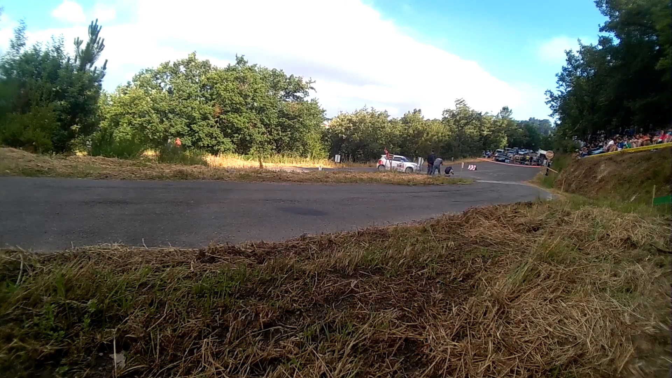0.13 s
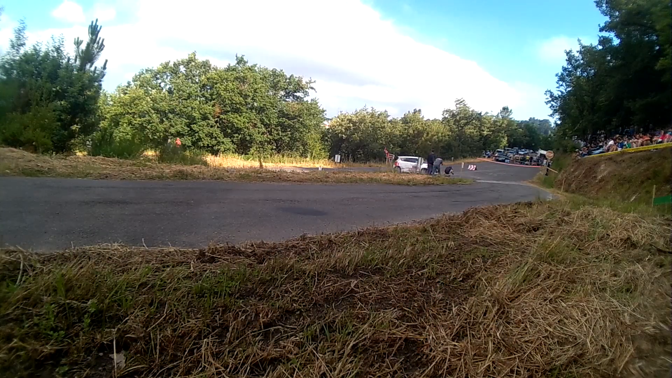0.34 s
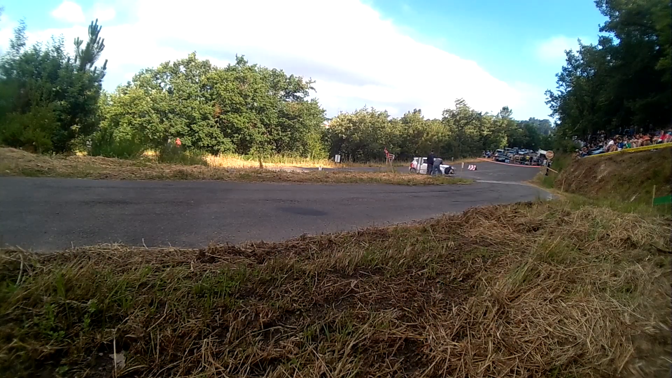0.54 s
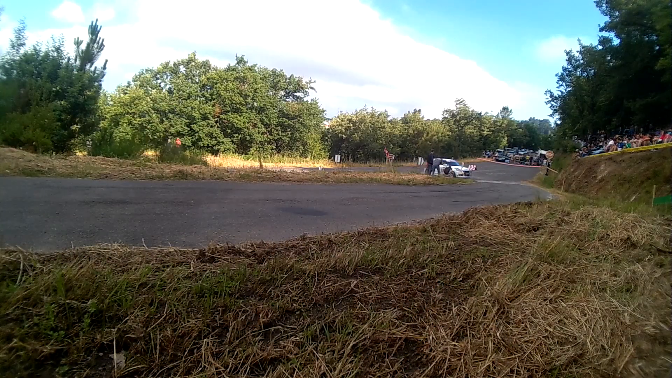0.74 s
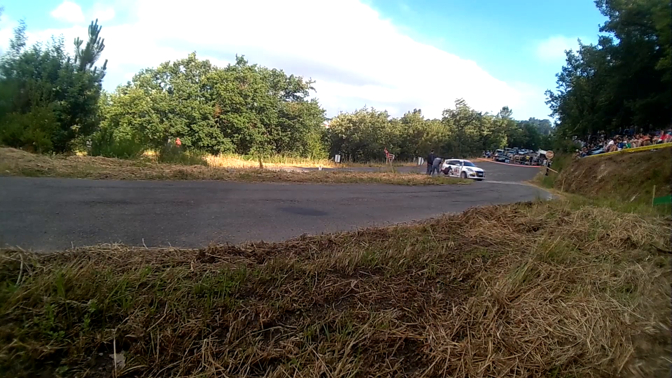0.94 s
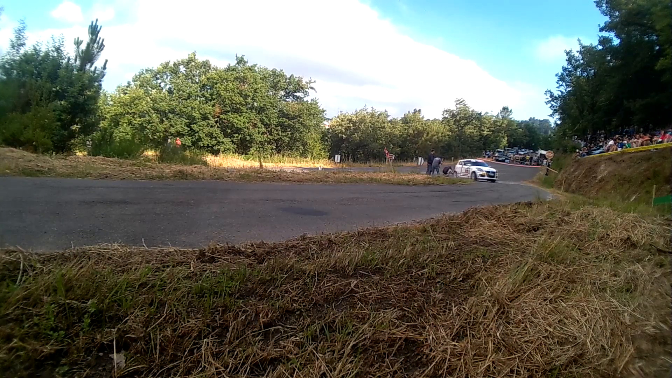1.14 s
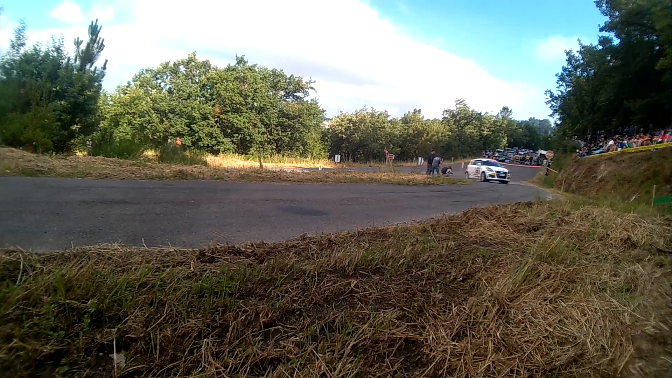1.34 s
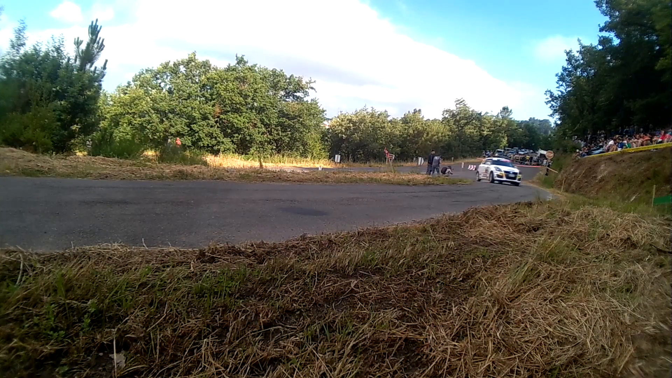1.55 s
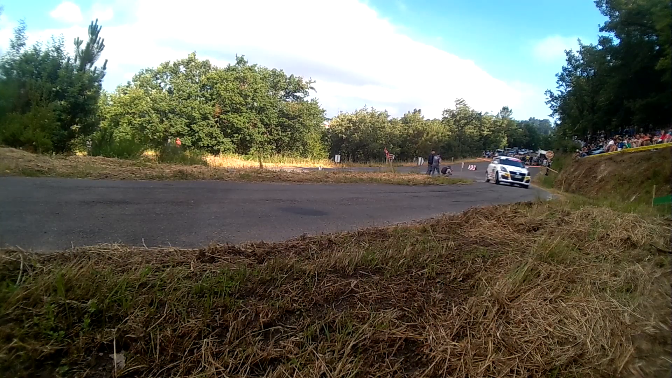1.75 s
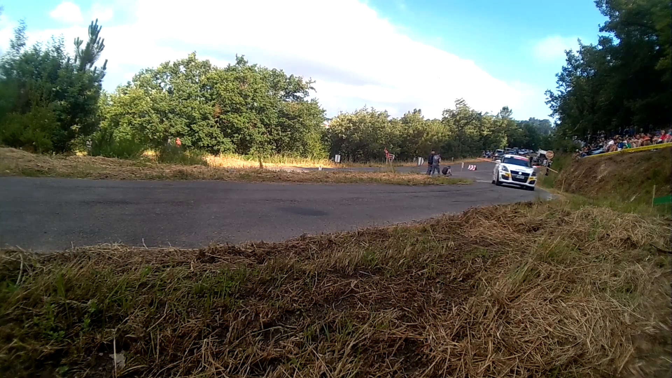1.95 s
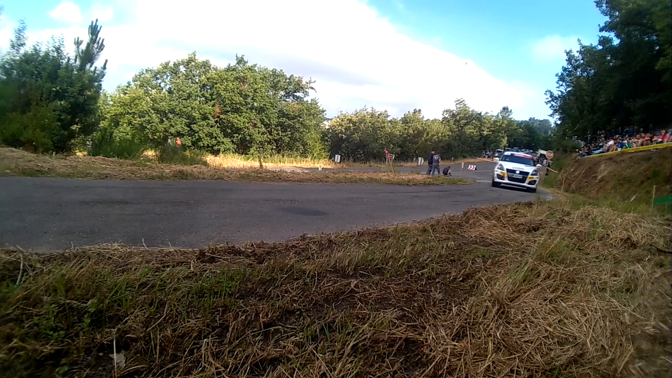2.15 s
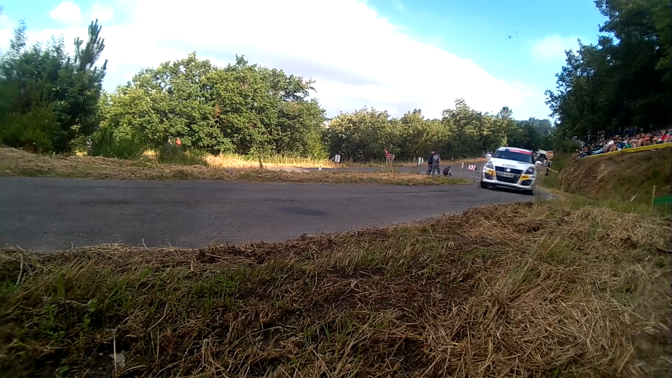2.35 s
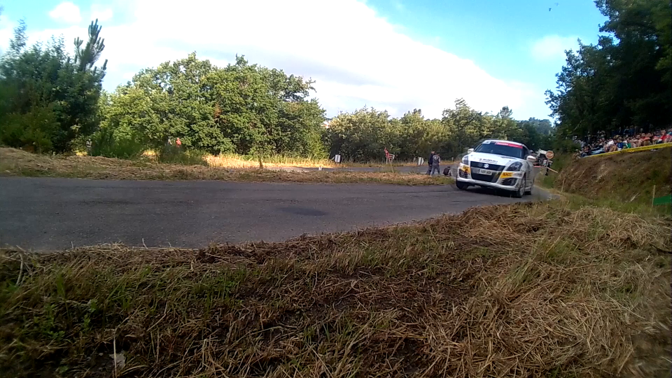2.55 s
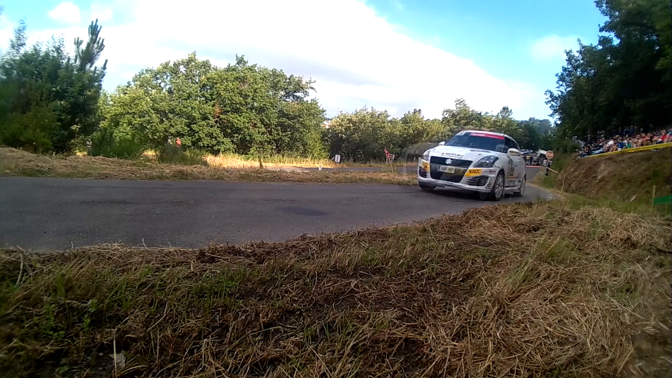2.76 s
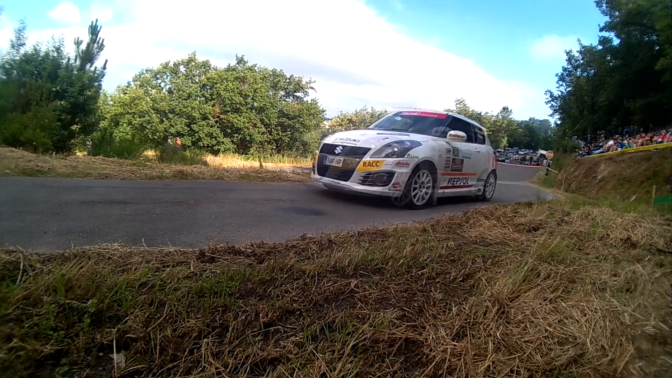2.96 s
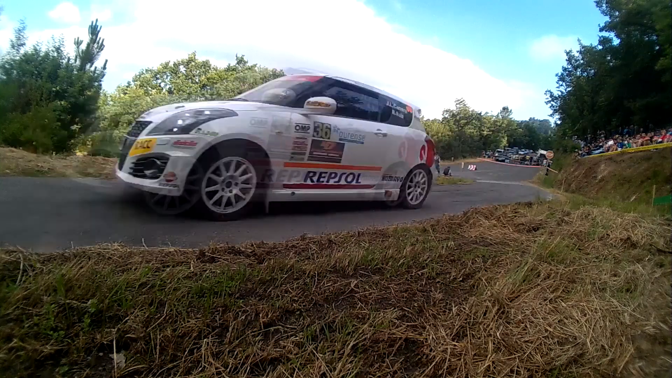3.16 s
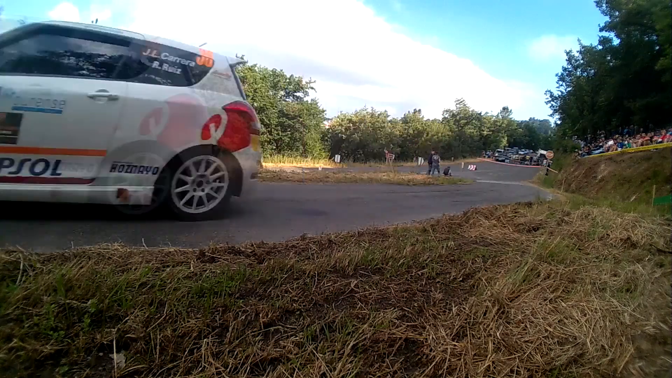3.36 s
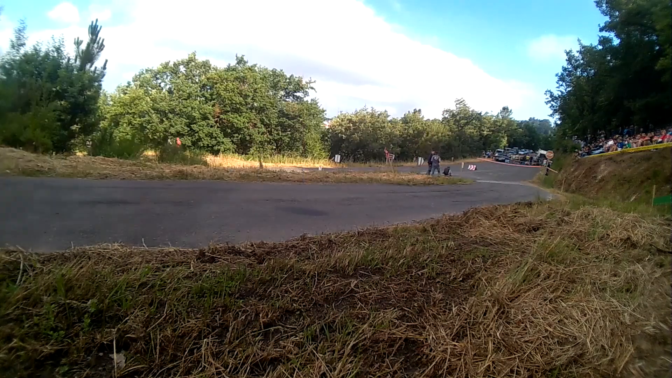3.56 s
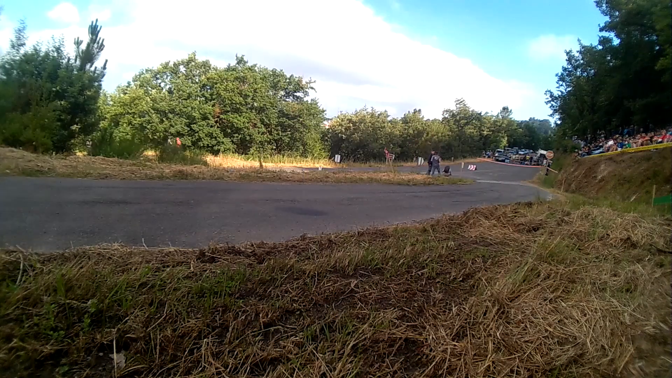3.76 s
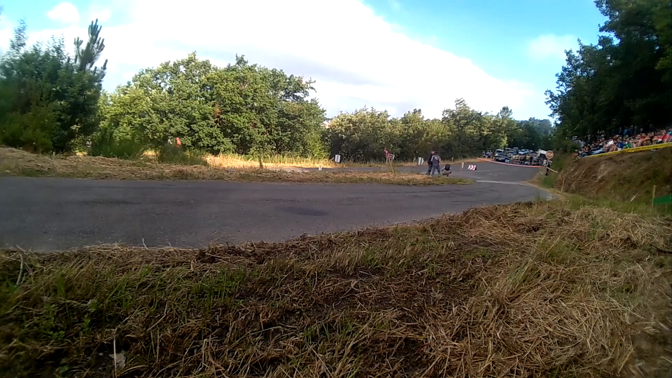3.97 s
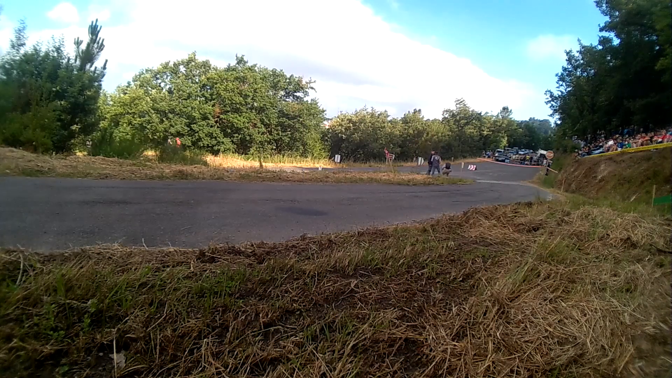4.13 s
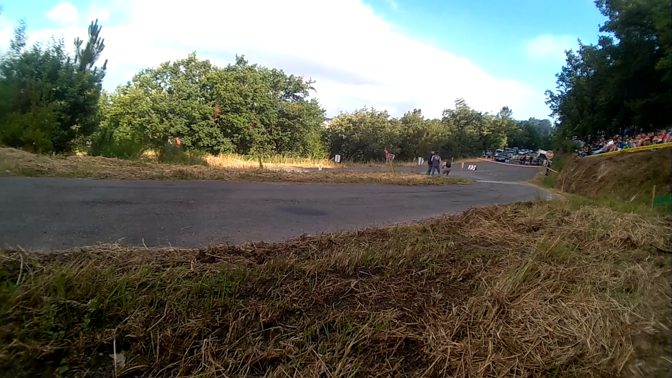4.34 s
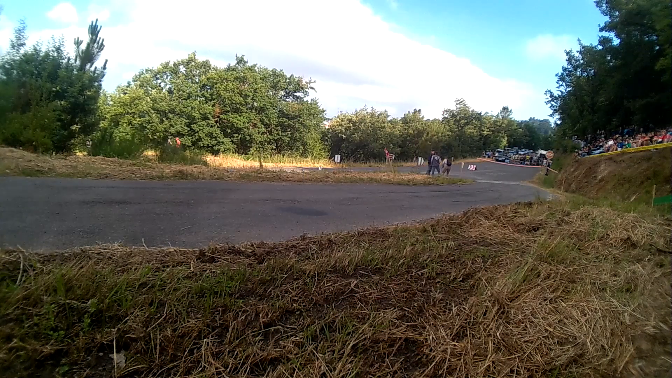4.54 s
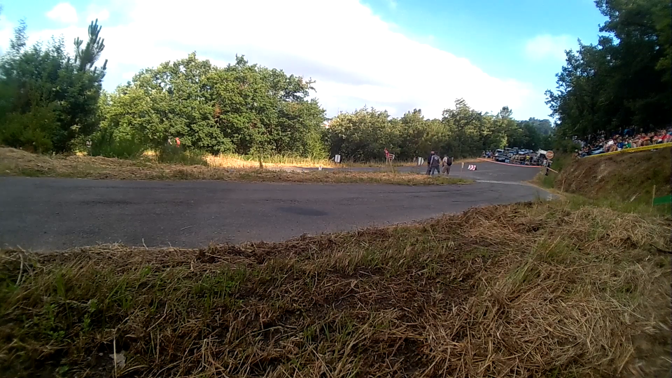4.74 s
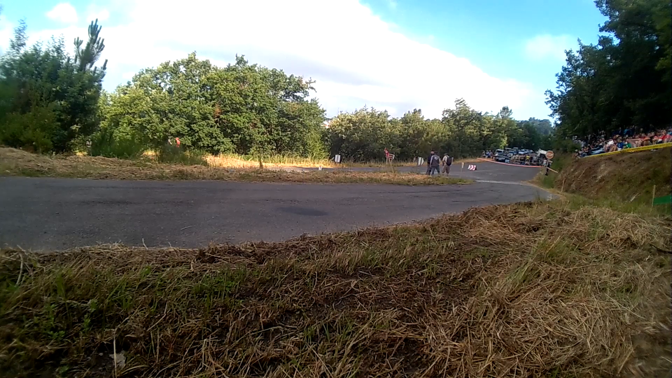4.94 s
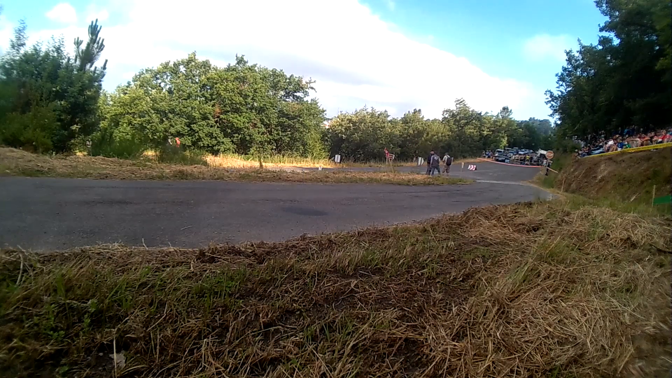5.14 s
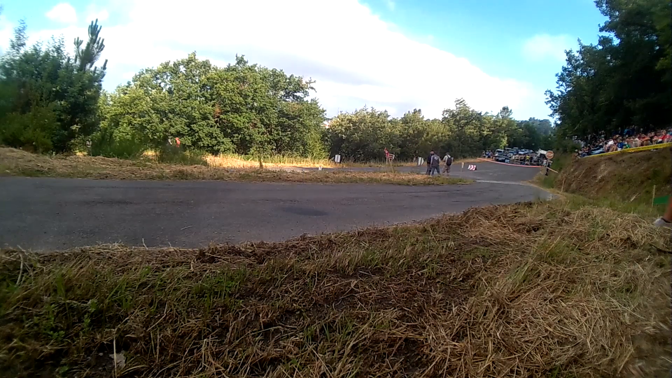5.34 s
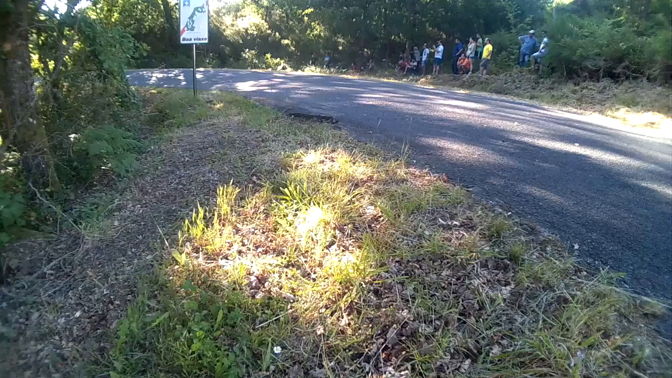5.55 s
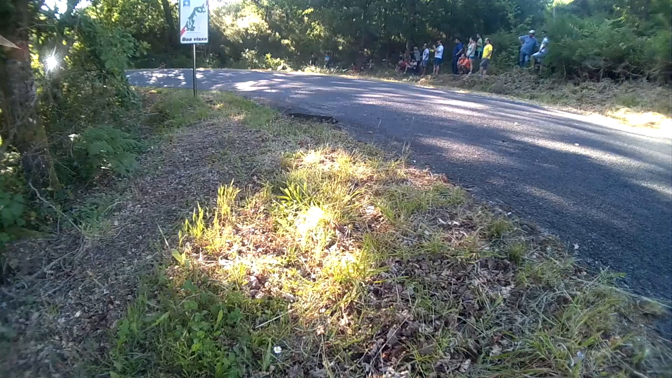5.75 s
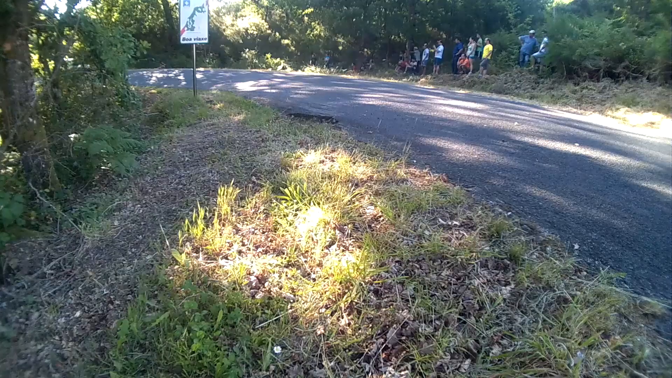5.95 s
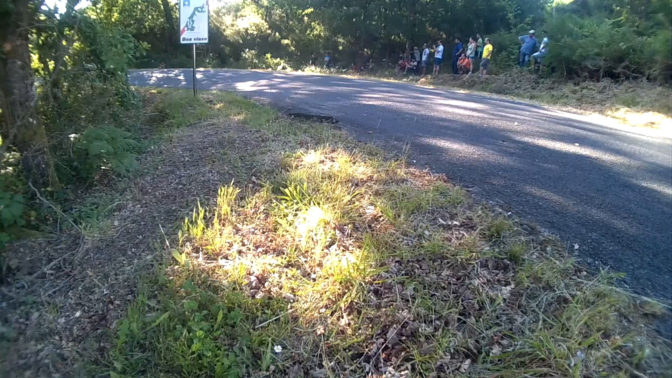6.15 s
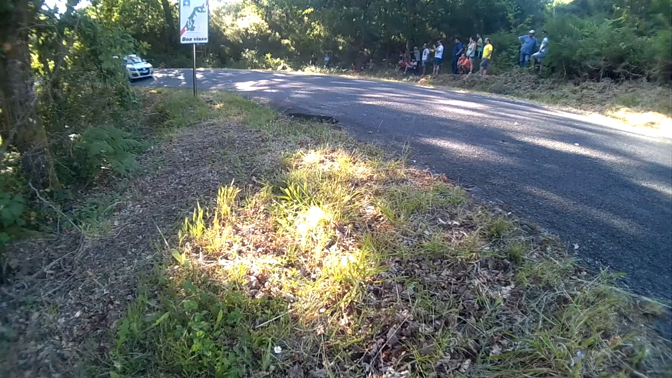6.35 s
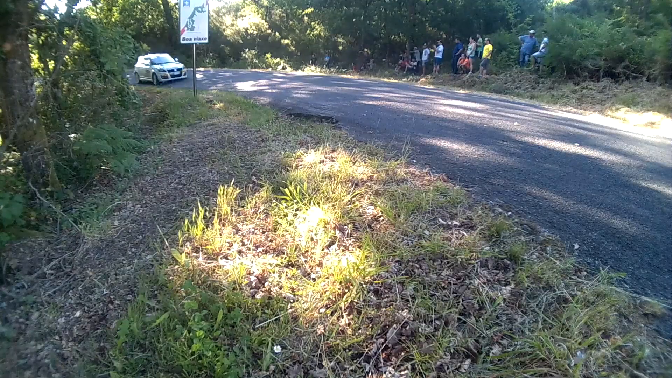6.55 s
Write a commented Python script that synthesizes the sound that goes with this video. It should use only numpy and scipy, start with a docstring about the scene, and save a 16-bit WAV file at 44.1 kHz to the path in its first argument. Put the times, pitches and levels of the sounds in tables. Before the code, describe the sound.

From a country road verge, a rally car is heard faintly accelerating out of a hairpin with tyre chirps. Its revs climb, the throttle lifts with a brief dull cough, then it roars past within metres, pitch falling and treble crackling with overload. It pulls away with rising revs, chirps its tyres at a gear change, and the sound cuts abruptly to a second car revving high in a bend.

```python
"""Two four-cylinder rally cars on a country road, heard from a microphone on the verge.
Tyres chirp as the first car accelerates out of a hairpin; it lifts, coughing, then sweeps past within 4 m.
Its pitch falls, harsh treble bursts out as it overdrives the recorder, and it pulls away until a gear
change, tyres chirping again. The scene then jumps to a second car, in a bend at high revs. Firing pulses
and surging noise, rung through filters, make the engines; trees echo over road rumble and faint hiss."""
import sys
import numpy as np
from scipy import signal
from scipy.fft import rfft, irfft
from scipy.io import wavfile
from scipy.ndimage import uniform_filter1d, minimum_filter1d, map_coordinates

SR = 44100
rng = np.random.default_rng(int(sys.argv[2]) if len(sys.argv) > 2 else 0)


def master(y):
    """Save y as 16-bit WAV."""
    cut = np.clip(np.atleast_2d(y).T, -1, 1)
    pcm = np.round(cut * 32767)  # scale
    wavfile.write(sys.argv[1], SR, pcm.astype(np.int16))


N = 291060
T = np.arange(N) / SR  # time of each sample [s]
JUMP_S = 5.572  # moment the scene jumps to the second car

# The first car's voice as each side of it faces the microphone: (frequency [Hz], level [dB])
FAR_NOSE = [(160, -29), (310, -3.5), (400, -5), (520, 3), (600, 0), (720, -3), (900, -1), (1080, -6),
            (1300, -1.5), (1450, -6.5), (1650, -20), (2100, -46), (2600, -34), (3300, -71)]
NEAR_NOSE = [(200, -29), (400, -12), (470, -6.5), (590, -3), (720, -11.5), (850, 2), (980, 0.5),
             (1150, 8.5), (1380, 4), (1550, -9.5), (1750, -27), (2150, -21.5), (2650, -26), (3300, -92.5)]
FLANK = [(150, -15.5), (295, -11.5), (450, -3), (570, -5), (720, -6), (860, 0), (1000, -7.5), (1170, 14.5),
         (1320, 6.5), (1560, -0.5), (1780, -17.5), (2150, -12), (2650, -26), (3300, -64)]
REAR_CORNER = [(150, -22), (295, -17.5), (445, -8), (595, -18.5), (740, -17), (890, -2), (1040, -16.5),
               (1180, 4), (1335, 0.5), (1480, -17.5), (1750, -34), (2100, -24.5), (2500, -47.5),
               (3200, -77.5)]
TAIL = [(160, -8.5), (330, -14), (490, -10.5), (650, 0), (800, -3), (930, -0.5), (1070, -7.5), (1200, 2.5),
        (1390, 2), (1490, -24), (1800, -35.5), (2200, -23.5), (2420, -44), (2800, -72)]
FAR_TAIL = [(180, -19.5), (370, -3.5), (550, -4.5), (710, 3), (790, -7.5), (900, -2), (1080, -12),
            (1260, -3), (1400, -11), (1700, -32.5), (2250, -20), (2450, -36), (2800, -66)]
# Start and end of each turn from one side to the next: (time [s])
FACING = [1.9, 2.199, 2.98, 3.14, 3.459, 3.541, 3.681, 3.86, 4.451, 5.101]


def sides_shown():
    """The share of each side, far nose to far tail, facing the microphone; shares cross-fade in each turn."""
    facing = np.interp(T, FACING, np.arange(1, len(FACING) + 1) // 2)
    return np.array([np.maximum(1 - abs(facing - side), 0) for side in range(6)])


# Firing rate as heard from the verge, Doppler shift included, before the shudder: (time [s], rate [Hz])
REVS_A = [(0.0, 157.7), (0.652, 168.4), (0.764, 165.2), (1.127, 176.5), (1.297, 175.3), (1.43, 185.1),
          (1.948, 205.1), (2.194, 222.6), (2.373, 232.3), (2.532, 236.3), (2.8, 220.7), (2.846, 207.5),
          (3.069, 158.9), (3.23, 143.6), (3.54, 145.8), (3.777, 152.7), (4.068, 158.2), (4.779, 175.4),
          (5.429, 191.9), (5.56, 180.9)]
# Pipe's bark, and the rasp above it, with throttle and distance, before trim: (time [s], level [dB])
BARK_A = [(0.0, -53.5), (0.55, -53), (1.3, -44.5), (1.52, -43), (1.95, -47), (2.2, -36.5), (2.53, -35.5),
          (2.6, -39.5), (2.82, -36.5), (2.9, -29), (3.05, -30), (3.24, -19), (3.42, -22), (3.53, -25),
          (3.63, -20), (3.95, -24), (4.28, -28), (4.55, -29), (4.85, -34.5), (5.15, -41.5), (5.39, -42.5),
          (5.45, -55.5), (5.56, -48.5)]
RASP_A = [(0.0, -53), (0.6, -52.5), (1.28, -47), (1.44, -42.5), (1.7, -43), (1.98, -41), (2.28, -33.5),
          (2.54, -31.5), (2.63, -35.5), (2.83, -30.5), (2.92, -23), (3.08, -28.5), (3.3, -23),
          (3.37, -21.5), (3.56, -18), (3.7, -19), (3.89, -21.5), (4.07, -27.5), (4.17, -35), (4.53, -34.5),
          (4.9, -43), (5.38, -48.5), (5.44, -52), (5.56, -53.5)]
# Base levels at the nearest distance, a row a side: (firing hum level [dB], engine bay fizz level [dB])
SIDE_LEVELS = [(-42, -60), (-39.5, -56), (-40.5, -61.5), (-47.5, -67.5), (-36.5, -67), (-34, -67.5)]
# Turbulence over tone close by [dB], its growth per dB of spreading loss, its change behind the car [dB]
BARK_ROUGH_DB, BARK_SCATTER, BARK_BEHIND_DB = -14.5, 0.47, -9.5
RASP_ROUGH_DB, RASP_SCATTER, RASP_BEHIND_DB = -11.5, 0.72, -5
LIFT_ROUGH_DB = 11  # added while the throttle is shut
FIZZ_REF_HZ, FIZZ_DB_PER_OCTAVE = 184, 10.5  # the bay hisses more as the revs rise


def first_car(lift_hum_db=-3, hum_waver_db=1.4, whine_db=-77, whine_falloff=1.3):
    """The car shows its nose, flank and tail in turn; it is cleanest close by and from behind, under throttle."""
    revs = curves(REVS_A)[0] + shudder()
    cycle = np.cumsum(revs * (1 + 0.00094 * wobble(22))) / SR
    # the intake throbs unevenly just before the car passes, the tailpipe after it
    uneven = 1 + .7 * around(2.95, .15) + .4 * (T > PASS_S)
    pulses = firings(cycle, jitter=.002, scatter_db=.25, uneven=uneven)

    shown = sides_shown()
    sides = [FAR_NOSE, NEAR_NOSE, FLANK, REAR_CORNER, TAIL, FAR_TAIL]
    tone = sum(share * unit(coloured(pulses, side)) for share, side in zip(shown, sides))

    far, shut = spreading_db(), lifted()
    behind = shown[-2:].sum(axis=0)
    hum_db, bay_db = np.transpose(SIDE_LEVELS) @ shown - far
    hum_db = hum_db + lift_hum_db * shut + hum_waver_db * (1 - behind) * wobble(7.2)
    bay_db = bay_db + FIZZ_DB_PER_OCTAVE * np.log2(revs / FIZZ_REF_HZ)

    bark_behind = BARK_BEHIND_DB * behind * (1 - shut)
    bark_rough = BARK_ROUGH_DB + BARK_SCATTER * far + bark_behind + LIFT_ROUGH_DB * shut
    rasp_rough = RASP_ROUGH_DB + RASP_SCATTER * far + RASP_BEHIND_DB * behind + LIFT_ROUGH_DB * shut
    voice = engine(cycle, tone, BARK_A, RASP_A, hum_db, bark_rough, rasp_rough,
                   surge=0.11, bark_db=-.5, rasp_db=-0.5, flutter_db=1.0)

    bay = bay_fizz(cycle, depth=0.33, lag=0.18) * amp(bay_db)
    ring = whine(pulses, whine_db - whine_falloff * far)
    return voice * misfire() + bay + overload_fizz(cycle) + ring


# Second car's firing rate as heard, Doppler shift included: (time [s], rate [Hz])
REVS_B = [(5.58, 221), (5.7, 221), (5.95, 210), (6.13, 216.5), (6.28, 229.5), (6.43, 219), (6.6, 219)]
# Its bark, and the rasp above it, before trim: (time [s], level [dB])
BARK_B = [(5.58, -47.5), (5.68, -46.5), (5.95, -48.5), (6.1, -43.0), (6.29, -38.5), (6.45, -40),
          (6.6, -40.5)]
RASP_B = [(5.58, -50), (5.64, -43.5), (5.85, -45.5), (6.05, -38), (6.09, -34.5), (6.18, -31.5), (6.3, -28),
          (6.4, -34), (6.47, -37.0), (6.6, -34)]
# Its voice, nose towards the microphone: (frequency [Hz], level [dB])
SECOND_CAR = [(220, -30), (440, -16), (560, -16), (670, -9), (900, -2), (1130, 2), (1370, -2), (1560, -19),
              (1780, -31), (2150, -24), (2600, -34), (3300, -62)]
# It draws nearer, hum and fizz growing: level at the jump [dB], rise [dB per s]
HUM_B_DB, HUM_B_DB_PER_S = -73.5, 18
FIZZ_B_DB, FIZZ_B_DB_PER_S = -85.5, 8.5


def second_car(rough_db=-4, cleaner_per_db=0.68, whine_db=-63):
    """A car nose on, its throttle feathered through the bend: the harder it pulls, the cleaner its note."""
    cycle = np.cumsum(curves(REVS_B)[0] * (1 + 0.00161 * wobble(22))) / SR
    pulses = firings(cycle, jitter=.005, scatter_db=.9, uneven=np.full(N, 1.5))
    tone = coloured(pulses, SECOND_CAR)

    effort_db = curves(RASP_B)[0]
    rough = rough_db - cleaner_per_db * (effort_db - effort_db[T > JUMP_S].mean())
    since = np.maximum(T - JUMP_S, 0)
    hum_db = HUM_B_DB + HUM_B_DB_PER_S * since
    voice = engine(cycle, tone, BARK_B, RASP_B, hum_db, rough, rough + 2,
                   surge=0.12, bark_db=-1.2, rasp_db=-1.0, flutter_db=2.0)

    fizz = bay_fizz(cycle, depth=.6, lag=.2) * amp(FIZZ_B_DB + FIZZ_B_DB_PER_S * since)
    return fizz + whine(pulses, effort_db + whine_db) + voice


# Turbulent gas flow in the engine: (frequency [Hz], level [dB])
GAS = [(60, -74.5), (150, -26.5), (280, -14.5), (470, -3.5), (660, -2.5), (1040, 3), (1380, 4.5),
       (1550, -5), (1760, -19), (2130, -14.5), (2500, -19), (2900, -44), (3600, -73.5), (5000, -110)]


def engine(cycle, tone, bark_curve, rasp_curve, hum_db, bark_rough_db, rasp_rough_db,
           surge, bark_db, rasp_db, flutter_db):
    """A clean firing hum, the pipe's bark up to 1 kHz and a rougher rasp above it."""
    bark_level, rasp_level = curves(bark_curve)[0], curves(rasp_curve)[0]
    gas = coloured(puffs(cycle, surge, lag=0.15), GAS)
    tone = cut(tone, 240, "high", order=6)  # leaves the firing rate itself mainly to the drone
    low_tone, low_gas = cut([tone, gas], 1000, "low")

    drone = np.sqrt(2) * np.cos(2 * np.pi * (cycle - .05)) * amp(hum_db)
    bark = blend(low_tone, low_gas, bark_rough_db) * amp(bark_level + bark_db)
    # moving air makes the higher orders flutter
    rasp_gain = amp(rasp_level + rasp_db + flutter_db * wobble(30))
    rasp = blend(tone - low_tone, gas - low_gas, rasp_rough_db) * rasp_gain
    return drone + bark + rasp


# The four cylinders, before scaling by uneven: (strength [dB], lateness [firing periods])
CYLINDERS = [(-0.5, 0.0026), (0.6, -0.00072), (-0.55, -0.011), (1, 0.0095)]


def firings(cycle, jitter, scatter_db, uneven):
    """One pulse per firing; the four cylinders differ in strength and timing, as much as uneven says."""
    index = np.arange(1, int(cycle[-1]))
    db, late = np.array(CYLINDERS)[index % len(CYLINDERS)].T * np.interp(index, cycle, uneven)
    chance = rng.standard_normal((len(index), 2))
    at = np.interp(index + late + jitter * chance[:, 0], cycle, np.arange(N))
    strength = amp(db + scatter_db * chance[:, 1])
    # a windowed sinc places each pulse between samples
    taps = at.astype(int)[:, None] + np.arange(-7, 9)
    offset = taps - at[:, None]
    pulse = np.sinc(offset) * np.cos(np.pi * offset / 16) ** 2
    return np.bincount(np.clip(taps, 0, N - 1).ravel(), (pulse * strength[:, None]).ravel(), N)


def puffs(cycle, depth, lag):
    """Noise that surges once per firing."""
    return rng.standard_normal(N) * np.exp(depth * np.cos(2 * np.pi * (cycle - lag)))


def blend(tone, noise, rough_db):
    """Mix tone and noise, the noise rough_db above the tone, to about rms 1."""
    return (steady(tone) + amp(rough_db) * steady(noise)) / np.hypot(1, amp(rough_db))


# Stabs of throttle that set the driveline shuddering: (time [s], initial swing of the firing rate [Hz])
STABS = [(1.627, 5.24), (2.245, 11.7), (3.156, 18.7)]
SHUDDER_HZ, SHUDDER_FADE_S = 4.342, 0.03008


def shudder():
    """The revs swing about their trend after each stab of throttle and settle."""
    swings = 0
    for stab_s, swing_hz in STABS:
        age = np.maximum(T - stab_s, 0)
        fade = 1 + age / SHUDDER_FADE_S
        swings = swings - swing_hz * np.sin(2 * np.pi * SHUDDER_HZ * age) / fade
    return swings


# The first car's path: moment it is nearest [s], speed [m/s], distance from the microphone then [m]
PASS_S, SPEED_M_PER_S, NEAREST_M = 3.53, 16.7, 3.65


def spreading_db():
    """How much weaker the first car is than at its nearest, by the inverse distance law."""
    return 20 * np.log10(np.hypot(1, SPEED_M_PER_S * (T - PASS_S) / NEAREST_M))


# Throttle shut, so that the engine runs ragged: (start time [s], end time [s])
LIFTS = [(2.58, 2.82), (5.4, 5.6)]


def lifted():
    """1 while the throttle is shut, else 0, with short ramps between."""
    return uniform_filter1d(sum(1. * ((T > start) & (T < end)) for start, end in LIFTS), size=1500)


def misfire(depth_db=7, length_s=.02):
    """A gain that dips for an instant each time the throttle shuts, as the note falters."""
    return amp(-depth_db * sum(around(start + length_s, length_s) for start, _ in LIFTS))


# Bursts of harsh treble as the loud car overdrives the recorder: (time [s], half length [s], level [dB])
OVERLOADS = [(3.185, .04, -64), (3.304, 0.032, -58), (3.475, 0.078, -53.5), (3.578, 0.047, -52),
             (3.736, 0.11, -54), (3.869, 0.027, -62.5), (3.943, .11, -75.5)]
# Colour of the harsh treble: (frequency [Hz], level [dB])
OVERLOAD_FIZZ = [(2000, -34), (2700, 1), (3300, -2), (3900, -5.5), (4500, -17.5), (4950, -22), (5300, -24),
                 (5600, -33.5), (6500, -27.5), (7100, -32.5), (8900, -21), (11000, -27.5), (13000, -37)]


def overload_fizz(cycle, ring_db=0, start_hz=4050, end_hz=3350, glide_s=3.53, glide_length_s=0.1, crackle_db=2):
    """Harsh treble, surging with each firing, as the loud car overdrives the recorder, in timed bursts."""
    fizz = unit(coloured(puffs(cycle, depth=3, lag=.2), OVERLOAD_FIZZ))
    # its brightest band glides down as the ground reflection shifts with the passing car
    high, low = [unit(signal.lfilter(*signal.iirpeak(hz, 7, fs=SR), fizz)) for hz in (start_hz, end_hz)]
    glided = np.clip((T - glide_s) / glide_length_s + .5, 0, 1)
    fizz = unit(fizz + amp(ring_db) * ((1 - glided) * high + glided * low))
    crackling = unit(fizz * amp(crackle_db * wobble(145)))
    return crackling * sum(amp(db) * around(s, half_length_s) for s, half_length_s, db in OVERLOADS)


# Hiss of the engine bay: (frequency [Hz], level [dB])
BAY_FIZZ = [(2000, -22.5), (2700, 1.5), (3150, -4.5), (3650, -1.5), (3950, -10.5), (4100, -14.5),
            (4400, -19), (4680, -12), (4900, -29), (5200, -24), (5600, -40.5), (9000, -37), (13000, -51.5)]


def bay_fizz(cycle, depth, lag):
    """High hiss from the engine bay, surging with each firing, at rms 1."""
    return unit(coloured(puffs(cycle, depth, lag), BAY_FIZZ))


# Thin metallic resonance: (frequency [Hz], level [dB])
WHINE = [(4700, -69), (5000, -15.5), (5080, 0), (5180, -9.5), (5290, 0), (5380, -16.5), (5600, -69.5)]


def whine(pulses, level_db):
    """The firings keep a narrow, high resonance ringing."""
    return steady(coloured(pulses, WHINE)) * amp(level_db)


# Exhaust coughs about the time the throttle shuts: (start time [s], level [dB])
POPS = [(2.58, -46), (2.615, -45), (2.65, -46), (5.39, -49)]


def coughs(swell_s=0.016):
    """Short dull puffs from the silencer: low noise that swells and dies away."""
    bursts = 0
    for start_s, db in POPS:
        age = np.maximum(T - start_s, 0) / swell_s
        bursts = bursts + amp(db) * age * np.exp(1 - age)
    dull = [(40, -27), (110, -14.5), (420, 9.0), (800, -8), (2000, -75.5), (4000, -110)]  # (Hz, dB)
    return bursts * steady(coloured(rng.standard_normal(N), dull))


# Tyre chirps, one list for each: (time [s], frequency [Hz], level [dB])
CHIRPS = [
    [(.04, 1040, -73), (.1, 944, -50), (.16, 834, -52), (.21, 860, -72)],
    [(.285, 1094, -49), (.33, 1148, -48), (.39, 1240, -46.5), (.44, 1170, -50)],
    [(.29, 970, -53), (.36, 900, -68), (.43, 810, -45)],
    [(5.22, 1283, -43), (5.28, 1365, -41.5), (5.315, 1404, -43.5), (5.36, 1345, -40.5), (5.41, 1335, -54)],
]


def tyre_chirps():
    """The tread slips in wavering chirps, each a gliding sine."""
    out = np.zeros(N)
    for chirp in CHIRPS:
        hz, db = curves(chirp)
        slipping = uniform_filter1d(1. * ((T > chirp[0][0]) & (T < chirp[-1][0])), size=800)
        phase = 2 * np.pi * np.cumsum(hz * (1 + 0.004 * wobble(120))) / SR
        out = out + slipping * amp(db) * np.sin(phase)
    return out


# Road rumble, pushed air and breeze at the microphone: (frequency [Hz], level [dB])
RUMBLE = [(15, -35.5), (40, -17.5), (90, -6), (170, 1), (280, 0), (600, -19.5), (1200, -63.5), (2500, -110)]


def road_and_breeze(wake_db=-53.0, ahead_falloff=1.7, behind_falloff=1.65, breeze_db=-82):
    """Road rumble and pushed air swell over a steady breeze and linger slightly behind the car."""
    falloff = np.where(T < PASS_S, ahead_falloff, behind_falloff)
    level = amp(wake_db - falloff * spreading_db()) + amp(breeze_db)
    return level * unit(coloured(rng.standard_normal(N), RUMBLE))


def trees(x, t60=0.29):
    """Trunks and banks scatter a thin, dull echo, which counts for less while the first car is close."""
    t = T[:SR // 2]
    scatter = cut(rng.standard_normal(len(t)), [500, 2500], "band", order=2)
    tail = scatter * amp(-60 * t / t60) * (t > .015)
    wet_db = -14 - 9 * around(4, .9)
    return amp(wet_db) * signal.oaconvolve(x, tail / np.linalg.norm(tail))[:N]


def amp(db):
    """Decibels to gain."""
    return 10 ** (np.asarray(db) / 20)


def unit(x):
    """Scale to rms 1."""
    return x / np.sqrt(np.mean(x ** 2) + 1e-20)


def steady(x, size=3000):
    """Scale to a running rms of about 1."""
    power = uniform_filter1d(uniform_filter1d(x * x, size), size)
    return x / np.sqrt(np.abs(power) + 1e-20)


def curves(rows):
    """One value per sample for each column after the time."""
    s, *cols = np.transpose(rows)
    return [np.interp(T, s, c) for c in cols]


def wobble(rate):
    """A smooth random curve, rate knots a second."""
    return map_coordinates(rng.standard_normal(int(N * rate / SR) + 4), [T * rate])


def around(s, width_s):
    """A bell-shaped weight in time."""
    return np.exp(-((T - s) / width_s) ** 2)


def coloured(x, points):
    """Ring x through a causal filter with the given (Hz, dB) shape, which dies away above its last point."""
    size = 4096
    hz, db = np.transpose([*points, (1.5 * points[-1][0], -120)])
    shape = amp(np.interp(np.log(np.fft.rfftfreq(size, 1 / SR) + 1), np.log(hz), db))
    # folding the cepstrum gives minimum phase
    cepstrum = irfft(np.log(shape + 1e-6))
    cepstrum[1:size // 2] *= 2
    cepstrum[size // 2 + 1:] = 0
    return signal.oaconvolve(x, irfft(np.exp(rfft(cepstrum))))[:N]


def cut(x, hz, kind, order=8):
    """Low-pass, high-pass or band-pass without delay."""
    return signal.sosfiltfilt(signal.butter(order, hz, kind, fs=SR, output="sos"), x)


def scene():
    """One car, then abruptly the other, over the road and a faint hiss."""
    first, second = first_car() + coughs(), second_car()
    before = np.clip((JUMP_S - T) / 0.0082, 0, 1)
    after = np.clip((T - JUMP_S) / 0.0046, 0, 1)
    cars = before * (first + trees(first)) + after * (second + trees(second))
    hiss = amp(-100) * rng.standard_normal(N)
    return (cars + tyre_chirps() + road_and_breeze() + hiss)[None]


def record(dry, ceiling=.29, top_hz=12700):
    """A fast limiter behind the microphone holds down the loudest peaks; a steep low-pass dulls the top."""
    needed = np.minimum(1, ceiling / (abs(dry) + 1e-9))
    held = minimum_filter1d(needed, size=400)
    gain = uniform_filter1d(uniform_filter1d(held, size=200), size=200)
    return cut(dry * gain, top_hz, "low", order=12)


dry = scene()
out = record(dry)
master(out)
```